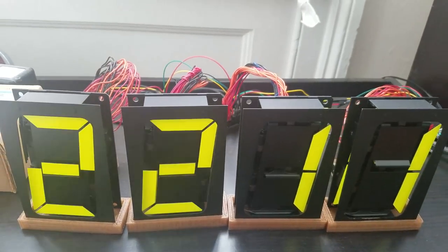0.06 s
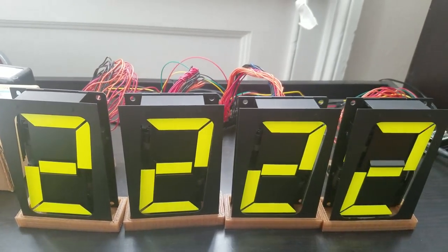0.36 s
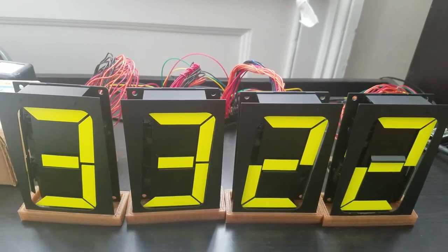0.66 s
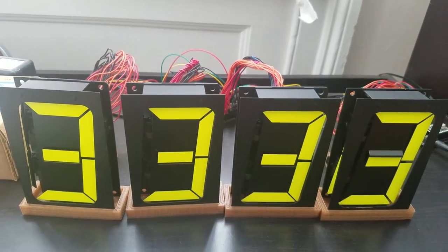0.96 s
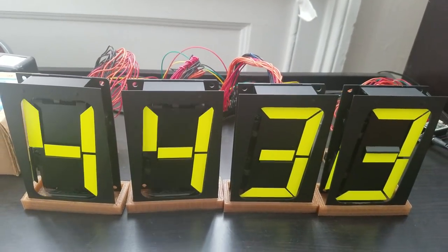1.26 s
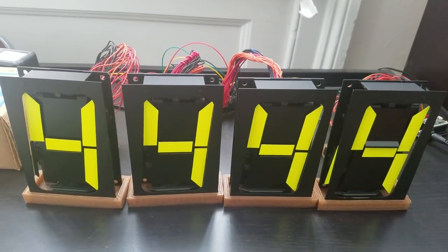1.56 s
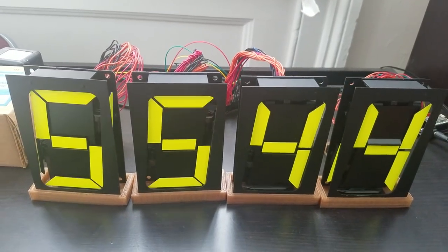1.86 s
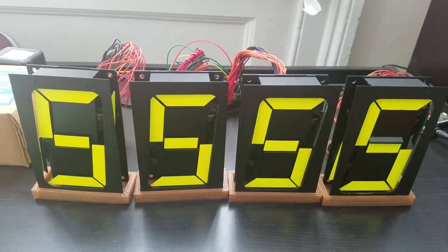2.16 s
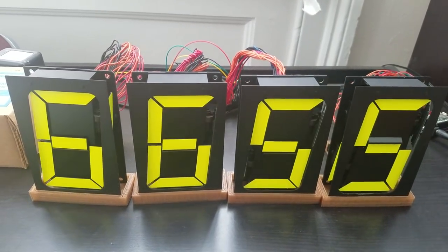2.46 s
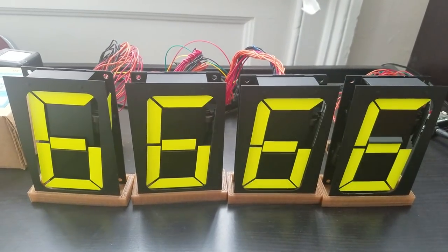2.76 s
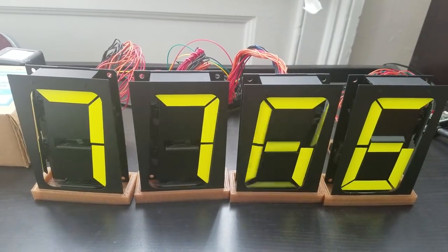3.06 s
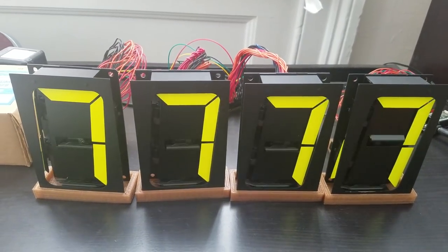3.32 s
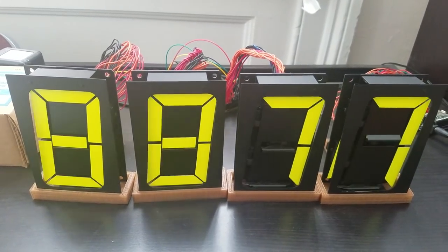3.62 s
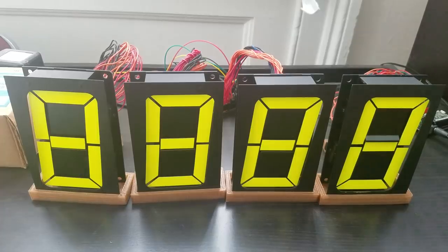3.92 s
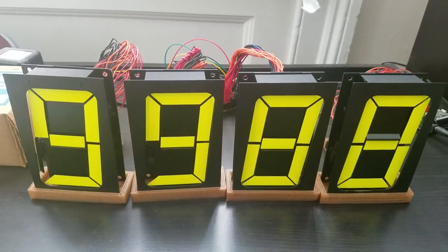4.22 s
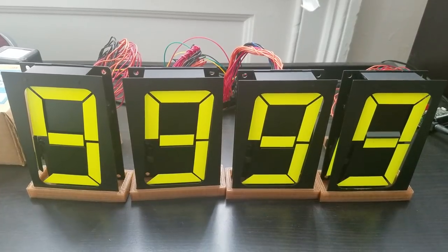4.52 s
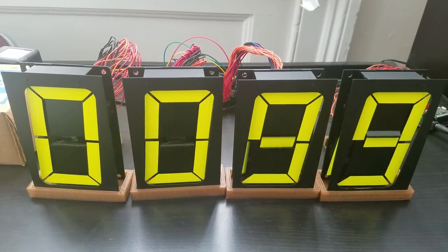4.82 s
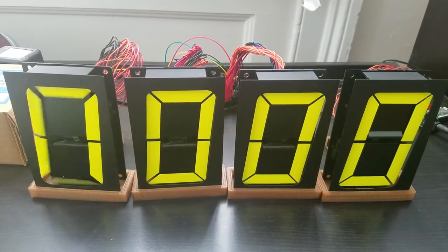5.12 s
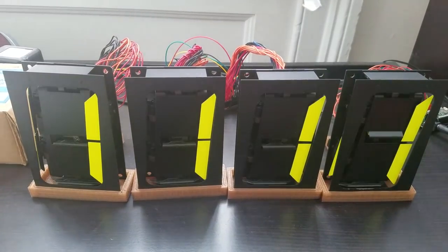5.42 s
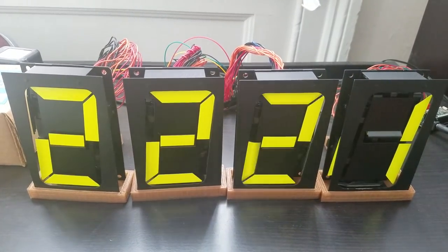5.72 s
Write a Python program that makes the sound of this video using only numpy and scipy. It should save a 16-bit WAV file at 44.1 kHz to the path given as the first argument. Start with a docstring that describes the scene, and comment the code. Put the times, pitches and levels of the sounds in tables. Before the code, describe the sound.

Small plastic flaps of mechanical number displays click sharply in quick runs of four, over a low hum in a small room.

```python
"""Four electromechanical seven-segment digits count up on a desk, one after the other, about 73 ms apart.
Coils throw plastic flaps against their stops: each landing is a sharp click that rings its digit's
housing and the small room. Twice a small metal part pings. A low motor hum and a dull rumble lie
underneath. Heard on a pair of microphones, with the digits close together around the centre."""
import sys
import numpy as np
from scipy import signal
from scipy.fft import rfft, irfft
from scipy.io import wavfile

SR = 44100
rng = np.random.default_rng(int(sys.argv[2]) if len(sys.argv) > 2 else 0)


def dump_mix(stems):
    """Bounce the given channels to the path in sys.argv[1] as a 16-bit WAV at rate SR."""
    frames = np.atleast_2d(stems).T  # one column per channel
    limited = np.clip(frames, -1, 1)  # hard clip at full scale
    pcm = np.round(limited * 32767).astype(np.int16)
    wavfile.write(sys.argv[1], SR, pcm)


N = 254898

MOTOR_HZ, RUMBLE_DB, CUTOFF_HZ = 58.15, -38.5, 15750
# the motor's sounding orders: multiples of its turning rate
HUM_ORDERS = [1, 2, 4, 6, 24, 32, 33, 34, 35]
# strength of each order before it wavers: level/dB
HUM_LEVELS = [-36, -58.5, -65.5, -58.5, -72.5, -67, -83.5, -70.5, -82]
# wavering low tones: f/Hz, rms level/dB
LOW_DRONES = [(47.4, -42), (161.5, -55.5)]
# spectrum of the room's rumble: f/Hz, relative level/dB
RUMBLE_SPECTRUM = [(22, -19), (36, -2), (51, 6), (66, 1), (100, -12), (150, -2), (200, -4), (260, -9.5),
                   (350, -10.5), (470, -21.5), (700, -18), (1500, -28), (3000, -36.5), (7000, -53.5),
                   (16000, -47.5)]
# likeness of diffuse sound at the two microphones: f/Hz, coherence/0-1
MIC_COHERENCE = [(60, 0.97), (125, 0.98), (250, 0.93), (500, 0.8), (1000, 0.1), (3000, 0)]

NUMERALS = "123456789012"  # the order of counting
# flaps that show in each numeral: numeral -> segment letters
NUMERAL_SEGMENTS = {"0": "abcdef", "1": "bc", "2": "abdeg", "3": "abcdg", "4": "bcfg", "5": "acdfg", "6":
                    "acdefg", "7": "abc", "8": "abcdefg", "9": "abcdfg"}
# the digits turn left to right, round and round, starting at the second:
# t/s, first flap's level/dB, lag of the other flaps or of a rebound/s, their joint level/dB
DIGIT_TURNS = [ (.0228, -21, 0.011, -18), (.0982, -17, 0.0037, -17), (.1733, -21, 0.0063, -20),
               (.5412, -22.5, 0.012, -20.5), (.6138, -20.5, 0.014, -22.5), (.6897, -20.5, 0.0085, -22.5),
               (.7551, -22.5, .016, -25), (1.1355, -22, 0.0063, -22.5), (1.2069, -30, .007, -19.5),
               (1.278, -19, 0.012, -21), (1.3445, -23, 0.014, -20), (1.7172, -26.5, 0.0086, -21),
               (1.7902, -27, 0.0049, -21), (1.8645, -19, 0.0027, -22), (1.9402, -18, 0.0028, -25),
               (2.3116, -24, 0.013, -36), (2.3857, -25, 0.01, -27.5), (2.4661, -22.5, 0.014, -40),
               (2.5318, -25.5, 0.021, -49), (2.897, -27.5, 0.0074, -16), (2.9699, -24, 0.0047, -16.5),
               (3.0468, -21.5, 0.0044, -16), (3.1156, -23.5, 0.0087, -17.5), (3.4894, -23.5, .006, -19.5),
               (3.5615, -22.5, 0.0084, -18.5), (3.6327, -27, .005, -15.5), (3.7099, -23, 0.0037, -20),
               (4.0909, -20.5, .015, -57), (4.1614, -22.5, 0.013, -55), (4.2349, -22.5, 0.018, -63),
               (4.3063, -25, 0.011, -62), (4.6678, -22.5, 0.012, -21), (4.7416, -18.5, 0.0033, -35),
               (4.8215, -19, 0.0021, -26), (4.8899, -25, .0055, -27), (5.11, -18.5, 0.0089, -24),
               (5.182, -22, 0.0038, -20), (5.253, -19, 0.0034, -19.5), (5.3182, -26.5, 0.012, -17),
               (5.5413, -30, 0.0049, -17), (5.6138, -30, 0.0065, -16.5), (5.6905, -16.5, .002, -20),
               (5.7649, -22.5, 0.0045, -17.5)]
# faint ticks of a flap stirring just before a count: t/s, level/dB
STIR_TICKS = [(0.5075, -51), (1.109, -47), (2.282, -47.5), (3.46, -42.5), (4.638, -42), (5.519, -44)]
# each digit's place and voice, left to right: left minus right/dB, low-mids/dB, treble/dB, housing drive/dB
DIGIT_VOICES = [(1.5, -1.1, -0.2, 2), (.5, 0.4, -0.6, 1.5), (-1, 0, -2.7, 1.5), (-1, 1.5, 0.3, 0)]
# a flap turning yellow side out snaps brightly, one turning away knocks: touch -> low-mids/dB, treble/dB
TOUCH_TONE = {"snap": (-3, 3), "knock": (2, -1.5)}
# spectrum of a flap's click: f/Hz, relative level/dB
FLAP_SPECTRUM = [(550, -22), (950, -14), (1600, -8.5), (2150, -5.5), (2800, 1), (3400, 1), (4300, 1.5),
                 (5800, -7.5), (7800, -10.5), (9800, -2), (11400, 0.5), (13500, -3), (15800, -5.5)]
FLAP_T60_S, CONTACT_T60_S, CONTACT_SHARE, FLAP_GAIN_DB = 0.023, 0.13, 0.75, 1
CHATTER_S, CHATTER_SHARE = .0016, 0.61  # a landing flap strikes once more, softer
FLAP_GAP_S, KNOCK_LAG_S, FLAP_FADE_DB = 0.0018, .006, 3.5  # the run of later flaps; knocks trail snaps
USUAL_DB, DULLING = -22, 0.41  # dB of treble lost per dB above a usual landing
HEAVY_SEGMENTS, HEAVY_LOW_DB = "ad", 1.5  # top and bottom flaps carry more low-mids
PAN_SCATTER_DB = 1
# modes of the housings, one list per digit, left to right: f/Hz, relative level/dB, t60/s
HOUSING_MODES = [
    [(630, -20, 0.023), (1595, -18.5, 0.032), (2804, -12.5, 0.0069), (2970, -12, 0.008)],
    [(695, -15.5, 0.023), (2800, -9.5, 0.012), (7820, -7, 0.019)],
    [(678, -15.5, 0.09), (1127, -19, 0.058), (3970, -27.5, 0.021)],
    [(626, -21.5, 0.066), (2505, -14, 0.018), (4750, -1, 0.0049)],
]
# the small room's ring: f/Hz, t60/s, relative level/dB
ROOM_RING = [(500, 0.28, -3.5), (1500, 0.28, -4), (3460, 0.28, -6), (6900, 0.36, -7.5), (10770, 0.25, -11),
             (16000, 0.27, -12.5)]
# thin metallic pings: t/s, level/dB
PING_HITS = [(1.356, -35), (3.712, -36)]
# modes of the pinging metal part: f/Hz, relative level/dB, t60/s
METAL_MODES = [(6277, 0, .25), (6729, -3, .27), (6966, -2, .24)]


def from_db(db):
    """Decibels to gain."""
    return 10 ** (np.asarray(db) / 20)


def rms_one(x):
    """Scale to rms 1."""
    return x / np.sqrt(np.mean(x ** 2) + 1e-20)


def at_hz(points, hz):
    """Read (f/Hz, value) points on a log-frequency axis."""
    points = np.array(points)
    return np.interp(np.log(np.maximum(hz, 1)), np.log(points[:, 0]), points[:, 1])


def dying(t, t60):
    """Exponential decay, 60 dB down at t60."""
    return np.exp(-np.log(1000) * t / t60)


def drift(count=18):
    """Slow random wander with a spread near 1."""
    return np.interp(np.arange(N), np.linspace(0, N, count), rng.standard_normal(count))


def add(out, sound, s):
    """Mix a stereo sound in at time s."""
    span = out[:, max(0, round(s * SR)):][:, :sound.shape[1]]
    span += sound[:, :span.shape[1]]


def tone(hz):
    """A sine of rms 1 that starts anywhere in its cycle."""
    return np.sqrt(2) * np.sin(2 * np.pi * (hz * np.arange(N) / SR + rng.random()))


def two_mics(mid, side, hz):
    """Diffuse sound is alike at both microphones in the bass and unrelated in the treble."""
    alike = np.clip(at_hz(MIC_COHERENCE, hz), 0, 1)
    return np.sqrt((1 + alike) / 2) * mid + np.sqrt((1 - alike) / 2) * side * [[1], [-1]]


def hum(motor_waver_db, drone_waver_db):
    """A motor in the room hums with a faint buzz of high orders; two low drones swell and fade."""
    motor = sum(from_db(db) * tone(order * MOTOR_HZ) for order, db in zip(HUM_ORDERS, HUM_LEVELS))
    drones = sum(from_db(db) * tone(hz) * rms_one(from_db(drone_waver_db * drift()))
                 for hz, db in LOW_DRONES)
    return motor * from_db(motor_waver_db * drift()) + drones


def rumble():
    """Dull, steady room tone reaches the microphones from all round."""
    hz = np.arange(N // 2 + 1) * SR / N
    mid, side = rfft(rng.standard_normal((2, N))) * from_db(at_hz(RUMBLE_SPECTRUM, hz))
    return from_db(RUMBLE_DB) * rms_one(irfft(two_mics(mid, side, hz), N))


def moving_flaps(old, new):
    """The flaps that move between two numerals, in landing order: (touch, segment)."""
    before, after = set(NUMERAL_SEGMENTS[old]), set(NUMERAL_SEGMENTS[new])
    snaps = [("snap", segment) for segment in sorted(after - before)]
    knocks = [("knock", segment) for segment in sorted(before - after)]
    return snaps + knocks


def turn(row, moving):
    """One flap lands, the rest follow in a fading run; a lone flap rebounds. Rows: t/s, level/dB, flap."""
    s, first_db, lag_s, late_db = row
    late = moving[1:] or moving
    touches = [touch for touch, _ in late]
    gaps = [FLAP_GAP_S if a == b else KNOCK_LAG_S for a, b in zip(touches, touches[1:])]
    times = s + lag_s + np.cumsum([0] + gaps) * rng.uniform(.8, 1.2)
    # knocks that trail snaps start their fade afresh, one step down
    fade_steps = [touches[:k].count(touch) + (touch != touches[0]) for k, touch in enumerate(touches)]
    fade_db = -FLAP_FADE_DB * np.array(fade_steps)
    levels = late_db + fade_db - 20 * np.log10(np.linalg.norm(from_db(fade_db)))
    return [(s, first_db, moving[0])] + list(zip(times, levels, late))


def landings(digit):
    """All landings of one digit: t/s, level/dB, low-mids/dB, treble/dB, left minus right/dB."""
    pan_db, digit_low_db, digit_treble_db, _ = DIGIT_VOICES[digit]
    rows = []
    for k, row in enumerate(DIGIT_TURNS, 1):
        count, place = divmod(k, len(DIGIT_VOICES))
        if place != digit:
            continue
        moving = moving_flaps(NUMERALS[count], NUMERALS[count + 1])
        for s, db, (touch, segment) in turn(row, moving):
            touch_low_db, touch_treble_db = TOUCH_TONE[touch]
            low_db = digit_low_db + touch_low_db + HEAVY_LOW_DB * (segment in HEAVY_SEGMENTS)
            treble_db = digit_treble_db + touch_treble_db - DULLING * (db - USUAL_DB)
            rows.append((s, db, low_db, treble_db, pan_db + PAN_SCATTER_DB * rng.standard_normal()))
    return rows


def flap_click(db, low_db, treble_db, hz, modes, scatter_db, mic_phase_rad):
    """One blow on the dense, well damped modes of a thin plastic flap, with new strengths each time."""
    chance = rng.standard_normal((5, len(hz)))
    # the two microphones hear the short waves out of step
    phase = 2 * np.pi * chance[0] + mic_phase_rad * hz / hz[-1] * chance[1:3]
    struck = from_db(at_hz(FLAP_SPECTRUM, hz) + scatter_db * chance[3:]) * np.exp(1j * phase)
    attack = (struck @ modes[:, :SR // 200]).real  # the first 5 ms set the level
    tilt = from_db(at_hz([(1600, low_db), (2700, 0), (5000, 0), (9000, treble_db)], hz))
    return from_db(db + FLAP_GAIN_DB) * ((struck * tilt) @ modes).real / attack.std()


def flaps(rows, mode_count=220):
    """The flaps of one digit hit their stops and chatter briefly."""
    t = np.arange(SR // 20) / SR
    hz = np.linspace(550, 16200, mode_count) + rng.uniform(-35, 35, mode_count)
    contact = 1 + CONTACT_SHARE * dying(t, CONTACT_T60_S)  # hardest at the first moment
    modes = np.exp(2j * np.pi * hz[:, None] * t) * dying(t, FLAP_T60_S) * contact
    out = np.zeros((2, N))
    for s, db, low_db, treble_db, pan_db in rows:
        pan = from_db(np.array([[.5], [-.5]]) * pan_db)
        for delay, share in [(0, 1), (CHATTER_S * (.5 + rng.random()), CHATTER_SHARE)]:
            click = flap_click(db, low_db, treble_db, hz, modes, scatter_db=3.0, mic_phase_rad=8.76)
            add(out, share * click * pan, s + delay)
    return out


def housing(rows, mode_table, scatter_db, low_share, mic_phase_rad):
    """Landings knock the digit's housing, whose few modes give it its own voice."""
    t = np.arange(SR // 4) / SR
    hz, mode_db, t60 = np.transpose(mode_table)
    modes = np.exp(2j * np.pi * hz[:, None] * t) * dying(t, t60[:, None])
    is_low = hz < 2000
    out = np.zeros((2, N))
    for s, db, low_db, _, _ in rows:
        chance = rng.standard_normal((4, len(hz)))
        strength = from_db(db + mode_db + low_share * low_db * is_low + scatter_db * chance[0])
        phase = 2 * np.pi * chance[1] + mic_phase_rad * hz / CUTOFF_HZ * chance[2:]
        add(out, ((strength * np.exp(1j * phase)) @ modes).real, s)
    return out


def room(direct, build_s, early_db, early_t60):
    """Reflections off desk and door reach the microphones, then the small room's short diffuse tail."""
    t = np.arange(SR * 6 // 10) / SR
    ring = np.array(ROOM_RING)
    edges_hz = np.geomspace(450, 18000, 10)
    build_up = 1 - np.exp(-t / build_s)
    early = from_db(early_db) * dying(t, early_t60)
    response = 0
    for low, high in zip(edges_hz, edges_hz[1:]):
        hz = np.sqrt(low * high)
        t60, band_db = at_hz(ring[:, [0, 1]], hz), at_hz(ring[:, [0, 2]], hz)
        envelope = build_up * (dying(t, t60) + early)
        band = signal.butter(3, [low, high], "band", fs=SR, output="sos")
        mid, side = signal.sosfilt(band, rng.standard_normal((2, len(t))))
        response += two_mics(mid, side, hz) * envelope / np.linalg.norm(envelope) * from_db(band_db)
    return signal.fftconvolve(direct, response, axes=1)[:, :N]


def pings():
    """Now and then a flap of the last digit sets a small metal part ringing."""
    t = np.arange(SR // 2) / SR
    out = np.zeros((2, N))
    for s, db in PING_HITS:
        for hz, mode_db, t60 in METAL_MODES:
            partial = np.sin(2 * np.pi * (hz * t + rng.random((2, 1))))
            add(out, from_db(db + mode_db) * dying(t, t60) * partial, s)
    return out


def scene():
    """Each digit clicks from its place on the desk, over hum and rumble; the leftmost also stirs."""
    stirs = [(s, db, 0, 0, 0) for s, db in STIR_TICKS]
    out = hum(motor_waver_db=-1.7, drone_waver_db=9.5) + rumble() + pings()
    for digit, mode_table in enumerate(HOUSING_MODES):
        rows = landings(digit) + (stirs if digit == 0 else [])
        drive_db = DIGIT_VOICES[digit][-1]
        clicks = flaps(rows)
        body = housing(rows, mode_table, scatter_db=3.5, low_share=.7, mic_phase_rad=6.5)
        direct = clicks + from_db(drive_db) * body
        out = out + direct + room(direct, build_s=0.0057, early_db=10.5, early_t60=0.044)
    return out


def record(dry):
    """The microphone pair's signal clips at full scale, then a steep low-pass cuts the top."""
    low_pass = signal.ellip(10, .1, 80, CUTOFF_HZ, fs=SR, output="sos")
    return signal.sosfilt(low_pass, np.clip(dry, -1, 1))


dry = scene()
out = record(dry)
dump_mix(out)
```